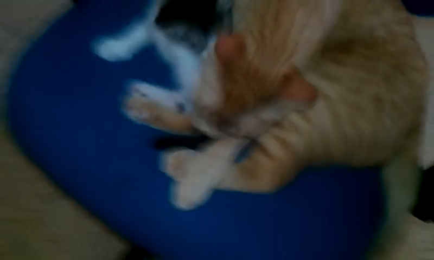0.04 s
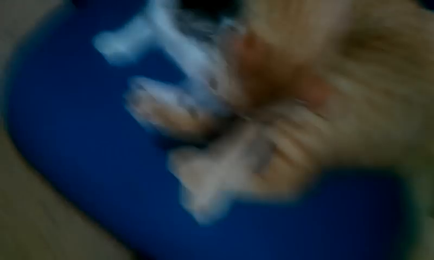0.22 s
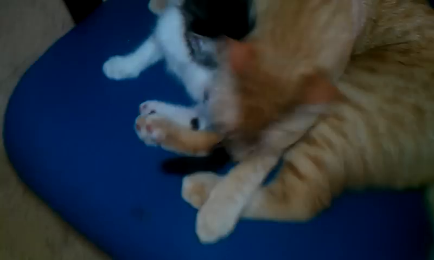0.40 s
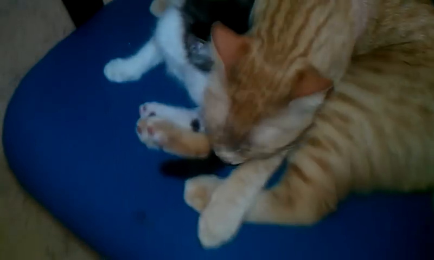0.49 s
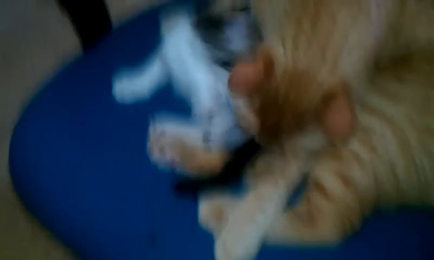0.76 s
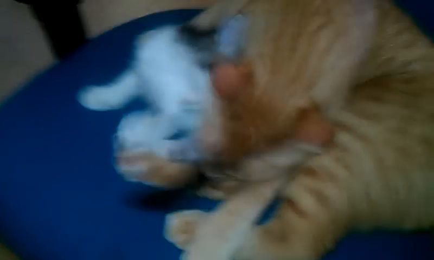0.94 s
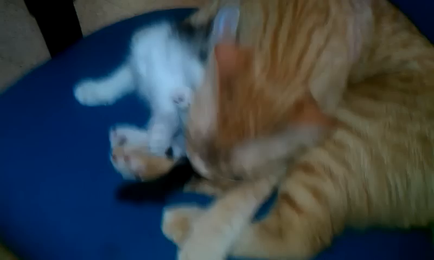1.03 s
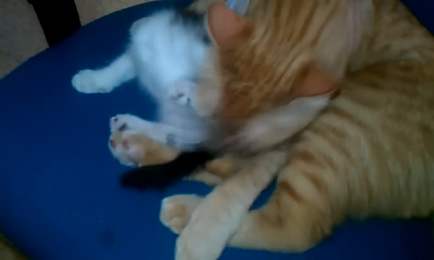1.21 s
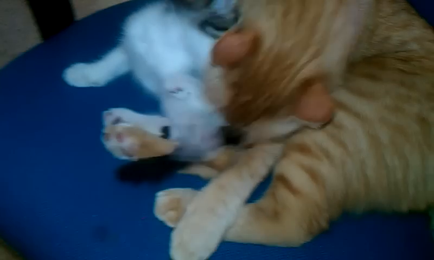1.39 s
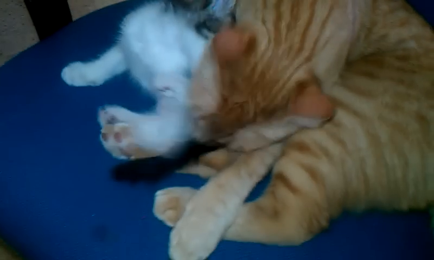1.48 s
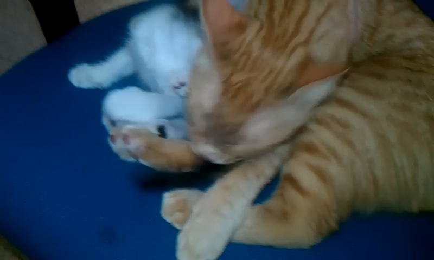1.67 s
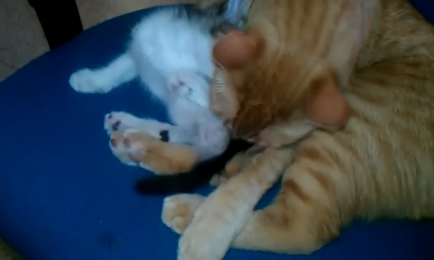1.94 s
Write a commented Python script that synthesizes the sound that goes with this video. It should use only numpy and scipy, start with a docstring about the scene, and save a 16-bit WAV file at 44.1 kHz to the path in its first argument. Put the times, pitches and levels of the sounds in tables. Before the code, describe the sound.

A cat licks its fur in one soft, raspy stroke with a crisp rustle, among scattered wet ticks. About a second earlier, the handheld microphone gives a rustle and a sharp click. Low room hum and hiss lie underneath.

```python
"""A cat grooms itself on a padded chair in a quiet room: one long rubbing stroke, with small wet
mouth ticks scattered around it. Uneven slips drive the stroke's hollow rasp, and fine catches of fur
lay a crisp rustle on top. About a second before it, the handheld camera rustles and its case gives
one sharp click with a soft thump. Low rumble, hum and microphone hiss lie underneath."""
import sys
import numpy as np
from scipy import signal
from scipy.fft import rfft, irfft
from scipy.io import wavfile
from scipy.ndimage import uniform_filter1d

SR = 44100
rng = np.random.default_rng(int(sys.argv[2]) if len(sys.argv) > 2 else 0)


def wav_out(sig):
    """Save sig, one row per channel (or a flat mono array), as 16-bit PCM at SR to the path in sys.argv[1]."""
    wavfile.write(sys.argv[1], SR, np.round(np.clip(np.atleast_2d(sig).T, -1, 1) * 32767).astype(np.int16))


N = 85995
TIME = np.arange(N) / SR

# Tone of the camera's rustle and crunch. Each row: frequency in Hz, relative level in dB.
HANDLING_SPECTRUM = [(300, -12.5), (800, -20), (1300, -14.5), (2000, -19), (2600, -28.5), (3300, -20.5),
                     (4300, -15), (5200, -14), (5900, -19.5), (7000, -5), (8400, -3.5), (10000, -13),
                     (12000, -25), (14000, -37)]


def from_db(db):
    """Decibels to gain."""
    return 10 ** (np.asarray(db) / 20)


def unit_power(x):
    """Scale to unit power."""
    return x / np.sqrt(np.mean(x ** 2) + 1e-20)


def envelope(rows):
    """Gain over time from (s, dB) points."""
    return from_db(np.interp(TIME, *np.transpose(rows)))


def colour(x, spectrum):
    """Equalise through (Hz, dB) points, rolling off beyond both ends; unit power."""
    hz, db = np.transpose(spectrum)
    freqs = np.maximum(np.arange(N + 1) * SR / (2 * N), 1)
    skirts = np.minimum(freqs / hz[0], 1) ** 2 * np.minimum(hz[-1] / freqs, 1) ** 6
    curve = from_db(np.interp(np.log(freqs), np.log(hz), db))
    return unit_power(irfft(rfft(x, 2 * N) * skirts * curve)[:N])


def noise(spectrum):
    """Smooth noise with the given spectrum."""
    return colour(rng.standard_normal(N), spectrum)


def drift(per_s):
    """Random wander with a spread near 1."""
    knots = rng.standard_normal(400)
    return np.interp(TIME * per_s, np.arange(len(knots)), knots)


def band(x, hz, width_hz):
    """A resonant band with steep sides; unit power."""
    edges = [hz - width_hz / 2, hz + width_hz / 2]
    return unit_power(signal.sosfilt(signal.butter(2, edges, "band", fs=SR, output="sos"), x))


def soften(x, above_hz):
    """Roll off the highs gently."""
    return signal.sosfilt(signal.butter(2, above_hz, fs=SR, output="sos"), x)


def ring(clicks, hz, t60):
    """Each click rings a cosine that falls 60 dB in t60 seconds."""
    radius, angle = from_db(-60 / (t60 * SR)), 2 * np.pi * hz / SR
    feedback = [1, -2 * radius * np.cos(angle), radius ** 2]
    return signal.lfilter([.5, 0, -.5 * radius ** 2], feedback, clicks + 1e-18)


def grains(per_s, spread_db):
    """Random tiny catches of uneven size, as one surface slides on another."""
    sizes = from_db(spread_db * np.minimum(rng.exponential(1, N), 4))
    signs = rng.choice([-1, 1], N)
    return sizes * signs * (rng.random(N) < per_s / SR)


def grooming_rasp():
    """Uneven slips drive a hollow resonance; narrow modes stand out where the stroke is firmest."""
    # Level of the hollow rasp. Each row: time in seconds, level in dB.
    stroke_levels = [(1.035, -78), (1.055, -55), (1.068, -56), (1.09, -47), (1.115, -55.5), (1.14, -50),
                     (1.185, -50), (1.25, -51), (1.3, -57.5), (1.43, -64), (1.55, -63.5), (1.75, -68.5),
                     (1.95, -79)]
    # Its narrow modes. Each row: centre in Hz, width in Hz, relative level in dB.
    narrow_modes = [(713, 27.6, -1.5), (772, 39, -2), (641.6, 51, -5.5), (823, 45, -15)]
    # A wider layer opens up under firm pressure. Each row: time in seconds, level in dB.
    open_levels = [(1.07, -64.5), (1.115, -56), (1.18, -50), (1.245, -53), (1.31, -57), (1.4, -60.5),
                   (1.7, -65.5)]
    # Tone of that layer. Each row: frequency in Hz, relative level in dB.
    open_spectrum = [(430, -15), (510, 9.5), (630, 6), (900, -4), (1030, 3.5), (1110, -1.5), (1300, 1),
                     (1650, -5.5), (1930, -5), (2120, -13.5), (2500, -7), (3100, -15), (4500, -16.5)]
    slips = grains(per_s=980, spread_db=0.5)
    strength = envelope(stroke_levels)
    modes = sum(from_db(db) * band(slips, hz, width) for hz, width, db in narrow_modes)
    broad = from_db(-5.5) * band(slips, hz=764, width_hz=235)
    hollow = broad + (strength / strength.max()) ** 0.45 * modes
    power = uniform_filter1d(hollow ** 2, int(0.047 * SR))  # the pressure holds even over 47 ms
    steady = hollow / np.sqrt(power + 1e-9)
    return strength * steady + envelope(open_levels) * colour(slips, open_spectrum)


def fur_rustle():
    """Dense fine catches of fur put a crisp top on the stroke."""
    # Swell of the rustle. Each row: time in seconds, level in dB.
    fur_levels = [(1.08, -72), (1.125, -58.5), (1.17, -58.5), (1.21, -46), (1.235, -51.5), (1.26, -54),
                  (1.295, -52.5), (1.33, -56), (1.36, -78), (1.41, -66), (1.46, -84), (1.6, -69),
                  (1.8, -76)]
    # Tone of the fur. Each row: frequency in Hz, relative level in dB.
    fur_spectrum = [(2000, -14), (2600, -19), (3400, -37), (4300, -12.5), (5400, -13), (6000, -26),
                    (7100, -7.5), (8300, -4.5), (10000, -13), (12000, -21.5), (16000, -41)]
    return envelope(fur_levels) * colour(grains(per_s=5000, spread_db=-2.5), fur_spectrum)


def mouth_ticks():
    """Each wet tick of the mouth is a brief crackle with a dull and a bright part."""
    # The ticks. Each row: start in seconds, dull level in dB, bright level in dB.
    ticks = [(0.0821, -42, -51), (0.207, -80, -51), (0.687, -86, -47), (1.122, -45, -58),
             (1.4171, -71, -51), (1.653, -54, -59)]
    # Tones of the two parts. Each row: frequency in Hz, relative level in dB.
    dull_spectrum = [(800, -10), (1200, 8), (1900, -1), (3000, -40), (4500, -7), (7000, -4)]
    bright_spectrum = [(3000, -9.5), (5000, -32), (8000, -3), (10500, -0.5), (12500, -18)]
    attack_s, decay_s = 0.00061, 0.0016
    dull, bright = noise(dull_spectrum), noise(bright_spectrum)
    out = np.zeros(N)
    for start, dull_db, bright_db in ticks:
        age = np.maximum(TIME - start, 0)
        shape = np.minimum(age / attack_s, 1) * np.exp(-np.maximum(age - attack_s, 0) / decay_s)
        out += shape * (from_db(dull_db) * dull + from_db(bright_db) * bright)
    return out


def case_click():
    """A few quick contacts ring the camera case amid a brief crunch."""
    # The contacts. Each row: time in seconds, treble drive in dB, body drive in dB.
    contacts = [(0.2460, -18, -48), (0.24877, -11.5, -22.5), (0.24947, -17.5, -27.5), (0.25021, -30, -18)]
    # Modes of the case. Each row: frequency in Hz, gain in dB, time to fall 60 dB in seconds.
    treble_modes = [(7120, -8, 0.0048), (8130, -4, 0.0052), (10800, -35.5, 0.0039), (14900, -18, .0026)]
    body_modes = [(410, -18, 0.032), (504, -14.5, 0.02), (1017, -9.5, 0.015), (1230, -17, .012),
                  (2410, -13, 0.0077), (4160, -10, 0.0035), (4920, -21.5, .006)]
    times, treble_db, body_db = np.transpose(contacts)
    crunch_shape = np.exp(-np.abs(TIME - .2495) / 0.0033)
    out = from_db(-33) * crunch_shape * noise(HANDLING_SPECTRUM)
    for modes, drive_db in ((treble_modes, treble_db), (body_modes, body_db)):
        hits = np.zeros(N)
        hits[(times * SR).astype(int)] = from_db(drive_db)
        out += sum(from_db(db) * ring(hits, hz, t60) for hz, db, t60 in modes)
    return soften(out, above_hz=12000)  # the contacts are slightly soft


def mount_thump():
    """The jolt of the click reaches the microphone through its soft mount."""
    jolt = np.zeros(N)
    jolt[int(.2505 * SR)] = -from_db(-31)
    return soften(ring(jolt, hz=63.4, t60=0.029), above_hz=248)


def handling_rustle():
    """The hand slides on the camera in dense fine catches."""
    # The rustle peaks around the click. Each row: time in seconds, level in dB.
    handling_levels = [(0, -60.5), (.12, -60.5), (.175, -54.5), (.215, -52.5), (.234, -48), (.26, -52.5),
                       (.269, -43.5), (.279, -46), (.287, -45.5), (.305, -47.5), (.325, -61.5), (.36, -63),
                       (.44, -61.5), (.5, -63.5), (.61, -61.5), (.74, -63), (1.0, -65), (1.1, -67),
                       (1.9, -70)]
    return envelope(handling_levels) * colour(grains(per_s=5000, spread_db=-2.5), HANDLING_SPECTRUM)


def room_tone():
    """Low room rumble with a hum that wavers in phase."""
    # Tone of the rumble. Each row: frequency in Hz, relative level in dB.
    rumble_spectrum = [(15, -66), (25, -1), (40, -9.5), (65, 0), (112, -5.5), (171, -3), (255, -7),
                       (282, -4.5), (345, -3.5), (681, -20), (997, -15.5), (3000, -24.5), (3900, -45),
                       (6600, -120)]
    # Tones of the hum. Each row: frequency in Hz, RMS level in dB.
    hum_tones = [(58.5, -72), (167.5, -70), (327, -82.5)]
    hum = np.zeros(N)
    for hz, db in hum_tones:
        phase = 2 * np.pi * hz * TIME + 0.57 * drift(per_s=7.94)
        hum += from_db(db) * np.sqrt(2) * np.sin(phase)
    return from_db(-62.5) * noise(rumble_spectrum) + hum


def microphone_hiss():
    """A bed of hiss whose level wavers slightly."""
    # Tone of the hiss. Each row: frequency in Hz, relative level in dB.
    hiss_spectrum = [(2000, -8), (3000, -4.5), (3900, -5.5), (5000, -3), (6400, -0.5), (7300, -18.5),
                     (8200, -3), (9300, -4.5), (10500, -7.5), (12500, -9), (15700, -9.5)]
    return from_db(-63.5 + 1.55 * drift(per_s=20)) * noise(hiss_spectrum)


def sizzles():
    """Faint narrow bands of hiss swell, flicker and fade, sinking slightly in pitch."""
    # Each row is one swell: midpoint in seconds, length in seconds, centre in Hz, level in dB.
    swells = [(0.132, 0.094, 5240, -63.5), (0.481, 0.14, 5680, -66.5), (0.572, 0.18, 5060, -68),
              (0.835, 0.16, 5650, -67), (0.856, 0.12, 4010, -71), (0.928, 0.15, 5150, -67.5),
              (1.13, 0.14, 5500, -68), (1.55, 0.17, 5750, -64), (1.899, 0.22, 5660, -64.5)]
    sag_hz_per_s, flicker_db = 860, 4.5
    out = np.zeros(N)
    for middle, length, hz, db in swells:
        swell = np.cos(np.pi * np.clip((TIME - middle) / length, -.5, .5))
        narrow_hiss = band(rng.standard_normal(N), hz, width_hz=300)
        sag = np.exp(-1j * np.pi * sag_hz_per_s * (TIME - middle) ** 2)  # a falling frequency shift
        whistle = np.real(signal.hilbert(narrow_hiss) * sag)
        out += from_db(db + flicker_db * drift(per_s=82)) * swell * whistle
    return out


def scene():
    """Cat, camera and room reach one microphone, alike in both channels."""
    camera = case_click() + mount_thump() + handling_rustle()
    cat = mouth_ticks() + fur_rustle() + grooming_rasp()
    background = room_tone() + microphone_hiss() + sizzles()
    return np.tile(cat + camera + background, (2, 1))


def record(dry):
    """The top is cut steeply above 15.8 kHz."""
    return signal.sosfilt(signal.ellip(10, .1, 70, 15800, fs=SR, output="sos"), dry)


dry = scene()
out = record(dry)
wav_out(out)
```